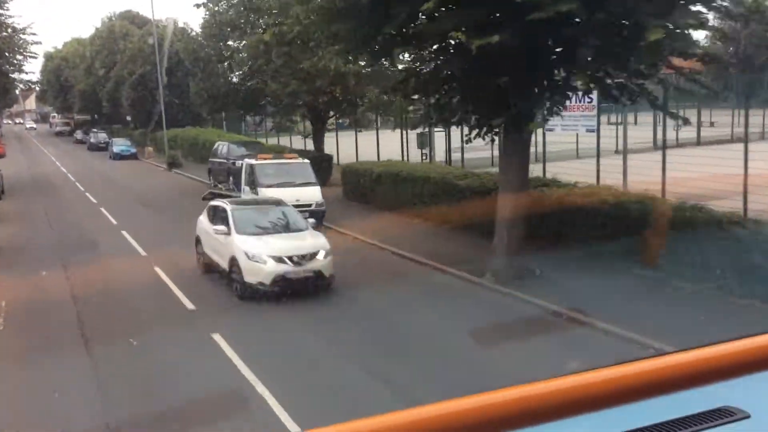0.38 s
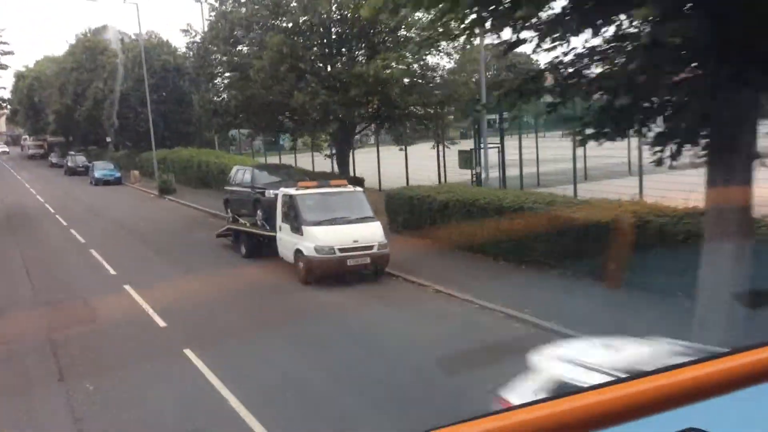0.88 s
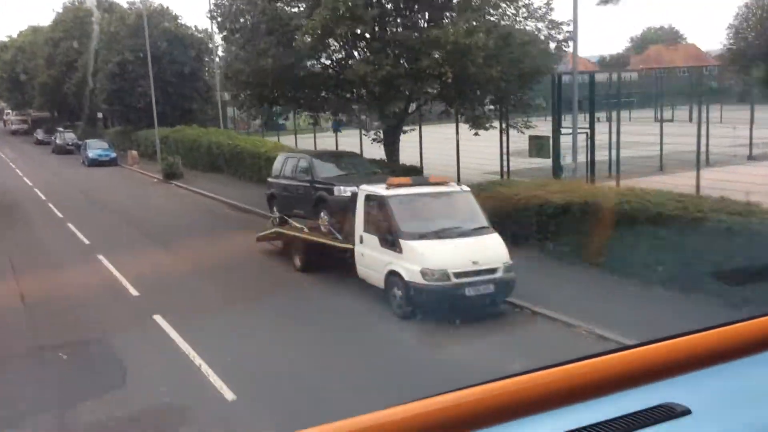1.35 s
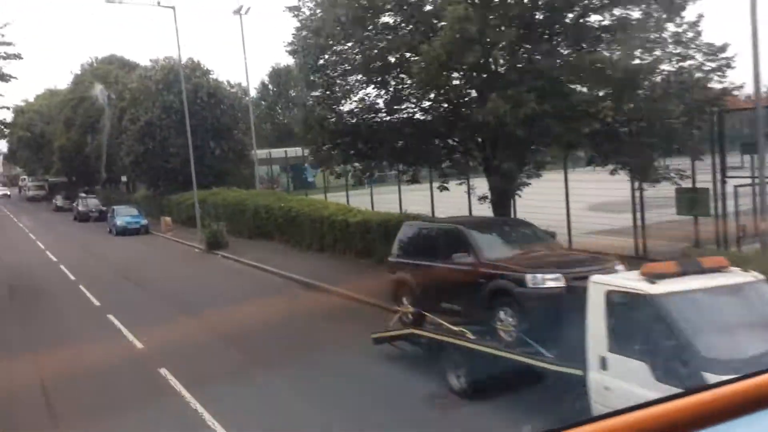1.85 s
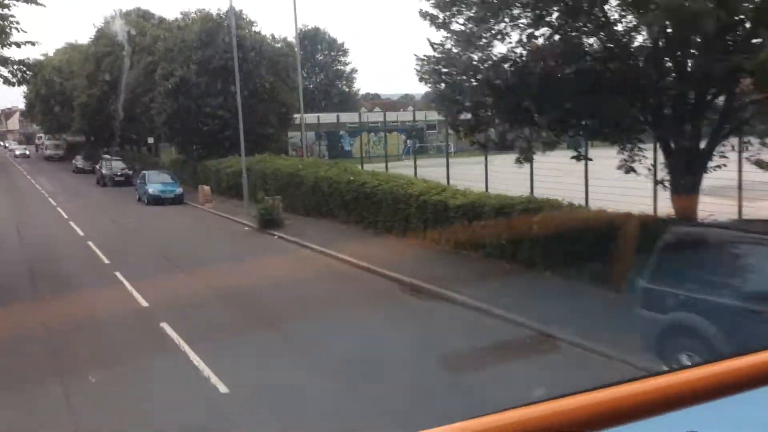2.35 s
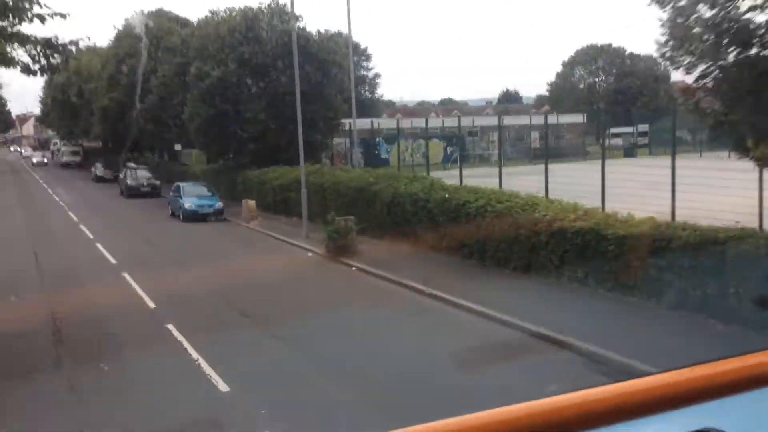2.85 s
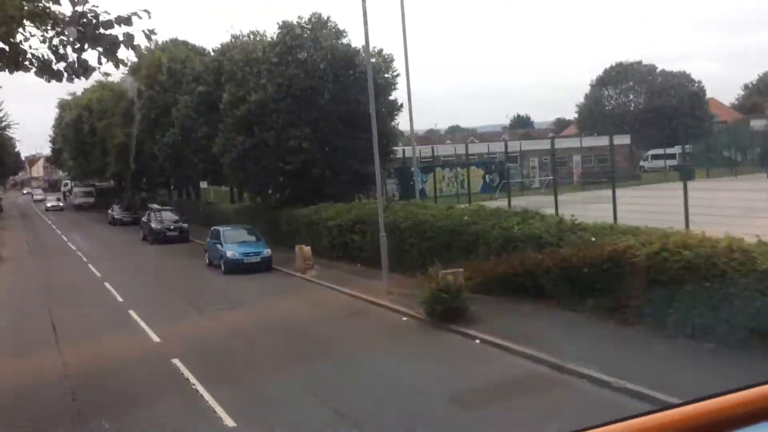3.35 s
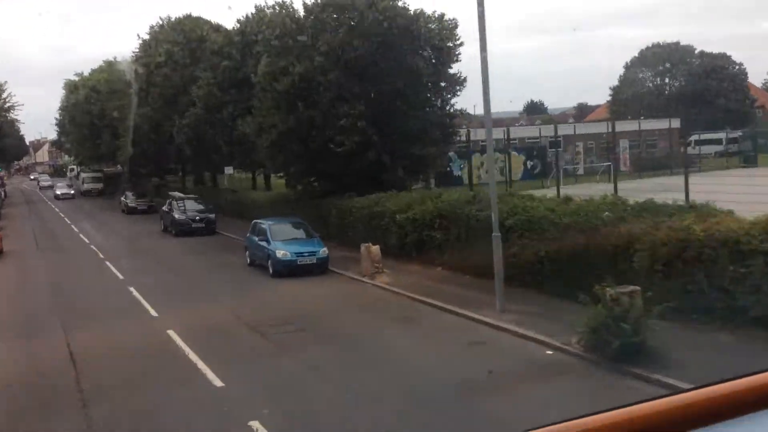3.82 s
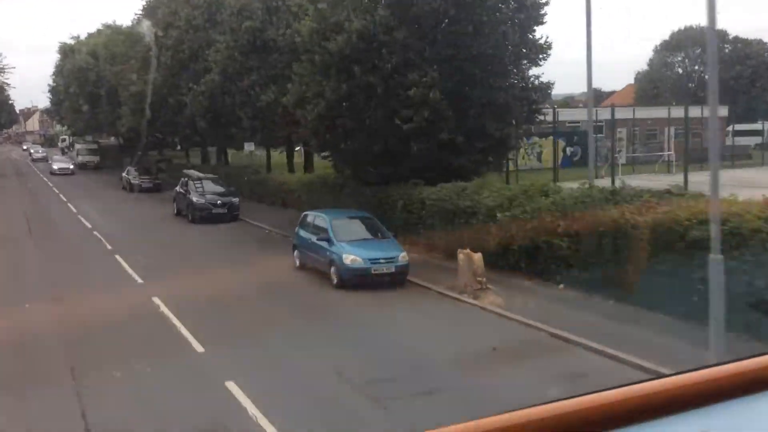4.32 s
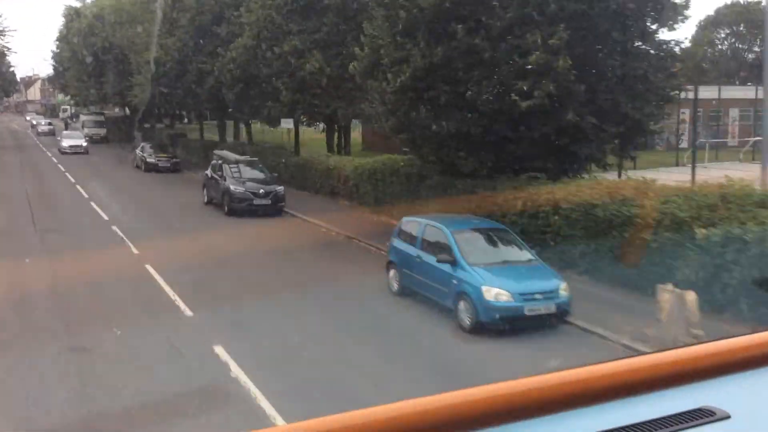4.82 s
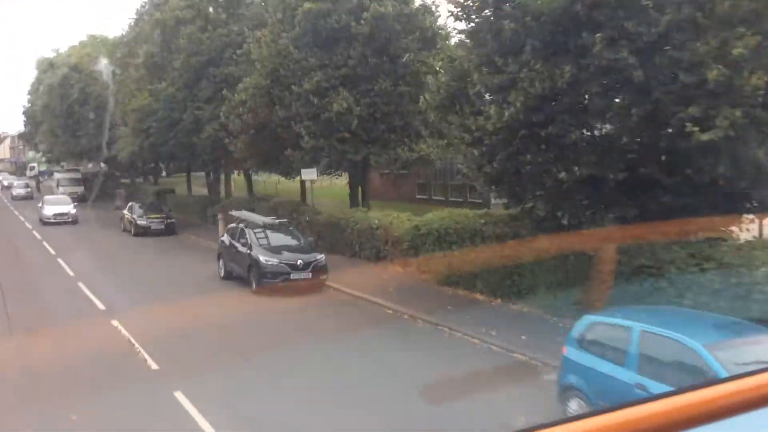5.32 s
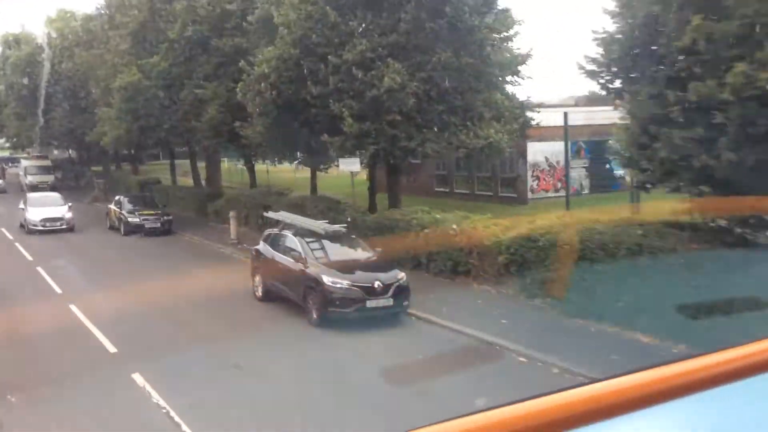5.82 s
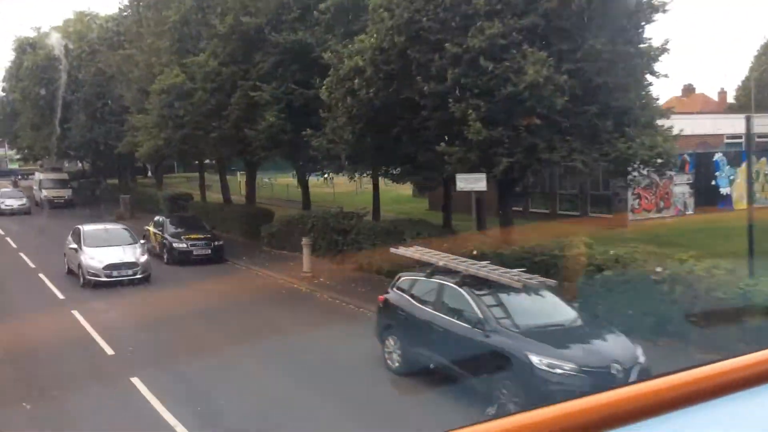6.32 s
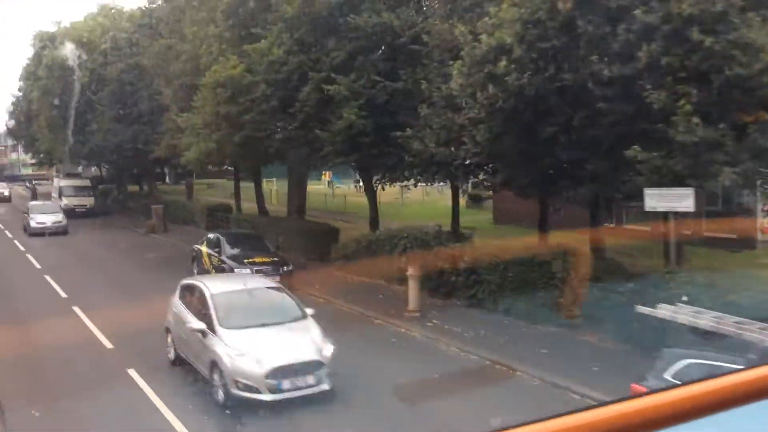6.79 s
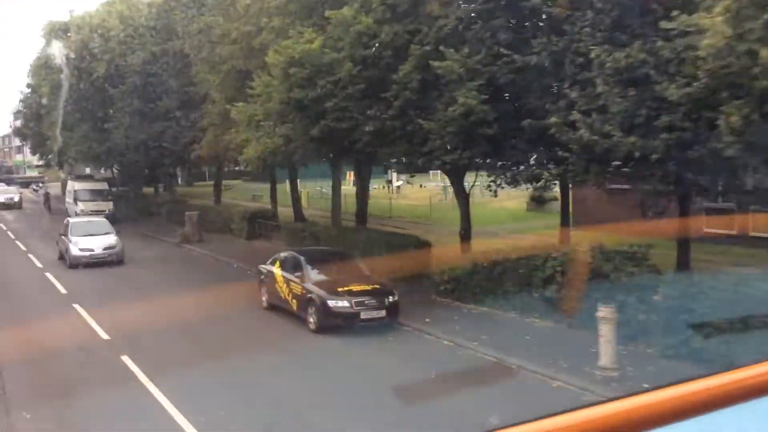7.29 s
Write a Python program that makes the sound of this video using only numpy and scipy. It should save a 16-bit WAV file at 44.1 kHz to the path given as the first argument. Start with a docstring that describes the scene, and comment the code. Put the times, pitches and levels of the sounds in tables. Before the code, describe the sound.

For about 7.4 seconds we sit at an upper-deck front window of a bus travelling steadily along a tree-lined residential road. A low diesel drone near 45 hertz, with higher hums, holds almost constant, sagging very slightly at the end. Soft road rumble and dull body roar surround it. The loose window knocks in fast, uneven chatter at roughly the engine's turning rate, with stronger knocks around 1.1-1.5, 1.9, 3.0, 3.5-3.8 and 5.0 seconds. Bumps swell the cabin boom, notably at 0.8-0.95, 1.9, 2.2 and 2.5-2.9, then more gently near 6.2 and 7.2. Trim buzz flares around 1.6 and 2.6-2.8. Thin treble ticks gather at 2.6-3.3, with isolated ones near 0.2, 1.6 and 4.0. A panel hums more around 3.8. The later seconds are somewhat calmer, the knocks generally lighter, and everything continues to the cut. Dry, close, mono, with a tiny cabin tail.

```python
"""A low diesel drone, a booming cabin, quick window knocks and buzzing trim, heard in mono at a front
seat on the upper deck of a bus at steady speed. The drone is sines on the engine's shaft orders; the road
is coloured noise with a low boom that swells over bumps. The loose window knocks about once a shaft turn,
each knock a short blow, a set of ringing modes and a rattle. A small fitting ticks in the treble, and the
cabin adds a short reverberant tail to knocks and ticks."""
import sys
import numpy as np
from scipy import signal
from scipy.fft import rfft, irfft, next_fast_len
from scipy.io import wavfile
from scipy.ndimage import map_coordinates

SR = 44100
rng = np.random.default_rng(int(sys.argv[2]) if len(sys.argv) > 2 else 0)


def invert_db(level):
    """Linear amplitude ratio for a level in decibels (20 dB per decade), elementwise."""
    return 10 ** (np.asarray(level, dtype=float) / 20)


def master_out(mix):
    """Clip the mix to full scale and print it as 16-bit PCM to the path in sys.argv[1]."""
    frames = np.transpose(np.atleast_2d(mix))
    ceiling = np.clip(frames, -1, 1)
    pcm = np.round(ceiling * 32767).astype(np.int16)
    wavfile.write(sys.argv[1], SR, pcm)


N = 327222  # length [samples]

# engine shaft speed before its small wander: (time [s], shaft turns per second [1/s])
SHAFT_SPEED = [(0, 22.58), (1.5, 22.47), (2.7, 22.41), (4.1, 22.27), (4.9, 22.47), (7.42, 22.05)]
# steady orders of the drone, before their sway: (shaft order [1], level [dB rms])
STEADY_ORDERS = [(2, -37.5), (4, -43), (6, -52), (12, -54)]
# fifth and eighth shaft orders, before their sway: (time [s], fifth [dB rms], eighth [dB rms])
CHANGING_ORDERS = [(0, -42, -43.5), (.8, -47, -46), (1.4, -40, -46.5), (2.1, -48.5, -52), (2.5, -46, -46),
                   (3.1, -44.5, -55), (3.8, -44.5, -47), (4.399, -43, -48), (5.1, -40, -46),
                   (5.5, -48, -51), (6.2, -47, -47), (6.9, -46.5, -53), (7.42, -47.5, -49.5)]
# low end along the way: (time [s], gain on rumble and second order [dB], note of the boom [Hz])
LOW_END = [(0, 0.5, 75), (.9, -1, 75), (1.5, 0.6, 78), (2.3, -1, 79), (2.7, 3, 76), (3.5, 1, 79),
           (4.2, 0.5, 80), (4.6, 0.4, 74), (5.3, 1.5, 79), (6, -1, 79), (6.5, -1.5, 78), (7.42, -1.5, 79)]
# bumps that swell the cabin boom: (start [s], length [s], level [dB])
BOOM_BUMPS = [(-0.003, 0.2, -38.5), (0.163, 0.014, -39), (0.237, 0.022, -31), (0.3, 0.036, -36),
              (0.453, 0.016, -32), (0.71, 0.046, -31), (0.833, 0.043, -27.5), (0.945, 0.015, -23),
              (1.116, 0.047, -34.5), (1.393, 0.071, -32), (1.528, 0.027, -33.5), (1.777, 0.078, -32.5),
              (1.904, 0.055, -26.5), (2.043, 0.048, -37.5), (2.176, 0.058, -28.5), (2.524, 0.344, -30),
              (2.972, 0.053, -35), (3.061, 0.098, -33), (3.197, 0.088, -36), (3.313, 0.26, -37.5),
              (3.863, 0.023, -28), (4.136, 0.021, -47), (4.267, 0.11, -37), (4.425, 0.065, -39.5),
              (4.948, 0.031, -38), (5.068, 0.13, -34), (6.103, 0.057, -33.5), (6.175, 0.037, -30),
              (6.422, 0.075, -32.5), (7.245, 0.034, -29.5), (7.343, 0.023, -37)]
# colour of the low road rumble: (frequency [Hz], relative density [dB per Hz])
RUMBLE_COLOUR = [(20, -12), (34, -6), (54, -1), (70, -0.5), (99, -3), (112, 0), (125, -4.5), (150, -4.5),
                 (168, -11.5), (208, -10.5), (255, -18.5), (297, -21), (322, -42), (430, -72), (800, -120)]
# road surface under the bus: (time [s], body roar [dB], trim buzz [dB])
ROAD_SURFACE = [(0, -48, -55.5), (.45, -49, -59), (.8, -49.5, -63.5), (.84, -49, -55.5), (1.1, -46, -57.5),
                (1.4, -45, -55.5), (1.62, -47, -50), (1.72, -47.5, -60.5), (1.93, -46.5, -57),
                (2.2, -48.5, -61.5), (2.5, -48.5, -57), (2.58, -45, -52), (2.83, -49.5, -52.5),
                (2.93, -49, -56.5), (3.3, -49, -53), (3.6, -49, -56), (3.95, -50, -60), (4.17, -48, -58),
                (4.3, -49.5, -60), (4.6, -49.5, -61), (4.75, -50, -58.5), (5.05, -49, -56.5),
                (5.3, -51, -61), (5.48, -50.5, -59), (5.65, -50, -60.5), (5.85, -52, -59),
                (6.4, -49.5, -62.5), (7.1, -48.5, -61), (7.42, -48.5, -56.5)]
# colour of the body roar: (frequency [Hz], relative density [dB per Hz])
ROAR_COLOUR = [(180, -25), (300, -12.5), (328, -0.5), (459, -3.5), (521, -2.5), (653, -2), (1140, -6.5),
               (1480, -11.5), (2600, -21.5), (3380, -22.5), (5720, -120)]
# floor and panels that colour the roar: (frequency [Hz], width [Hz], level relative to the roar [dB])
PANEL_HUMS = [(296.5, 27, -14.5), (612, 31, -16), (667, 44, -14.5), (764, 50, -16), (977, 96, -18.5),
              (1471, 29, -22)]
# notes of one floor panel: (frequency [Hz], level relative to its hum [dB])
FLOOR_PANEL_NOTES = [(390, -0.7), (447, -1.7)]
# hum of that floor panel: (time [s], level relative to the roar [dB])
FLOOR_PANEL_HUM = [(0, -13), (.6, -14.5), (2.2, -17), (3.2, -7), (3.8, -4), (4.3, -10.5), (5.5, -8.5),
                   (6.5, -9.5), (7.42, -12.5)]
# colour of the trim buzz: (frequency [Hz], relative density [dB per Hz])
BUZZ_COLOUR = [(710, -2), (1200, -6), (1480, 0), (1610, -3), (2680, -6), (3050, -10), (3500, -3),
               (4420, -8.5), (5010, -8.5), (6820, -15), (7500, -16.5), (8100, -14.5), (8700, -18),
               (9270, -18), (11500, -27.5), (14200, -38.5), (15100, -47)]
# clear knocks of the window: (time of the clack [s], nominal peak [dB])
CLEAR_KNOCKS = [(0.0453, -40.5), (0.0867, -37.5), (0.2209, -42), (0.2883, -42.5), (0.3571, -44),
                (0.4284, -46), (0.5115, -45), (0.5567, -45.5), (0.6444, -51), (0.6898, -49.5),
                (0.824, -39.5), (0.8949, -37.5), (0.9803, -45), (1.0176, -46), (1.051, -39.5),
                (1.0892, -35.5), (1.1792, -39), (1.2274, -39), (1.275, -37), (1.3159, -40), (1.3638, -40.5),
                (1.4045, -32), (1.4484, -35.5), (1.489, -34), (1.5345, -46), (1.6242, -38.5), (1.666, -45),
                (1.785, -42), (1.8206, -46), (1.8504, -38.5), (1.8906, -32.5), (1.9362, -38), (1.982, -45),
                (2.0288, -39.5), (2.0957, -42.5), (2.1455, -48), (2.19, -51), (2.229, -43), (2.362, -44),
                (2.4236, -42), (2.5476, -38), (2.586, -37.5), (2.622, -37.5), (2.6837, -41),
                (2.7151, -39.5), (2.7781, -44), (2.9133, -50), (2.9542, -38), (2.9939, -41),
                (3.0324, -34.5), (3.075, -37), (3.1492, -42.5), (3.2355, -42), (3.3002, -43.5),
                (3.344, -37.5), (3.3687, -39.5), (3.3957, -44), (3.4296, -42), (3.468, -45),
                (3.5155, -36.5), (3.5657, -32), (3.6122, -40.5), (3.657, -36), (3.707, -34.5),
                (3.7499, -38.5), (3.841, -36.5), (3.9337, -41.5), (3.9737, -39.5), (4.0682, -46.5),
                (4.1066, -38.5), (4.155, -36.5), (4.2443, -49), (4.3316, -45), (4.4648, -46),
                (4.5627, -41.5), (4.6107, -43), (4.6872, -46.5), (4.7082, -42), (4.7446, -44),
                (4.7805, -40), (4.8179, -42.5), (4.904, -43.5), (4.9495, -38.5), (4.996, -35),
                (5.0434, -31.5), (5.0888, -39), (5.1766, -38), (5.2644, -50), (5.309, -42.5),
                (5.3537, -38.5), (5.4001, -41), (5.4456, -35.5), (5.4849, -38), (5.5308, -41),
                (5.671, -41.5), (5.711, -43.5), (5.7309, -42.5), (5.8042, -41), (5.847, -45), (5.8886, -44),
                (5.9788, -36.5), (6.0686, -44), (6.116, -41.5), (6.1624, -42.5), (6.2444, -47),
                (6.2916, -44), (6.3689, -47.5), (6.4325, -43), (6.4772, -44.5), (6.5182, -40.5),
                (6.6573, -39), (6.6977, -46.5), (6.744, -48), (6.788, -43.5), (6.8297, -46), (6.8887, -43),
                (6.945, -44.5), (7.0189, -37.5), (7.0628, -43), (7.104, -43.5), (7.1472, -45),
                (7.1969, -38.5), (7.2937, -48), (7.3325, -41), (7.354, -45)]
# click, knock and clack in each blow:
# (frequency [Hz], level relative to the knock [dB], peak after first contact [s])
BLOW_PARTS = [(5050, -8.5, 0.0011), (1521, -10, 0.0027), (2353, -13.5, 0.0023), (3102, -2, 0.0025),
              (3525, -7, 0.0032), (3940, -13.5, 0.0012)]
# modes of pane and frame:
# (frequency [Hz], level relative to the knock [dB], t60 [s], start after first contact [s])
PANE_MODES = [(449, -10, 0.11, 0.0009), (634, -9.5, 0.098, 0.00088), (747, -8.5, 0.024, 0.00076),
              (1000, -23, 0.14, 0.00069), (1220, -22, .1, .0008), (1455, -12, 0.074, 0.00072),
              (1976, -14.5, 0.057, 0.00099), (2420, -22.5, 0.11, .0012), (2580, -23.5, .09, 0.00121),
              (3027, -16, .1, .0042), (3430, -17, 0.092, .0042), (3890, -19, 0.058, .001),
              (4130, -22.5, .07, 0.00104), (4680, -27, .09, .002), (5240, -33, .09, .002),
              (5870, -29, 0.032, 0.00014), (6380, -24, 0.028, .0001)]
# thin ticks of a small fitting: (time [s], nominal level [dB])
FITTING_TICKS = [(0.1945, -56.5), (1.5998, -53.5), (2.5865, -55), (2.603, -51), (2.616, -52), (2.6439, -53),
                 (2.7194, -54), (2.795, -55), (2.844, -52), (3.174, -51), (3.2344, -57), (3.3104, -58),
                 (4.0322, -59)]
# decay of the cabin: (frequency [Hz], t60 [s])
CABIN_DECAY = [(500, 0.11), (3000, 0.22), (10000, 0.28)]


def unit(x):
    """Scaled to rms 1."""
    return x / np.sqrt(np.mean(x ** 2) + 1e-20)


def along(points, hz):
    """Values at hz, read from (frequency, value) points on a log axis."""
    f, v = np.transpose(points)
    return np.interp(np.log(hz + 1), np.log(f + 1), v)


def curves(rows):
    """One value per sample for each column after the time."""
    s, *cols = np.transpose(rows)
    return [np.interp(np.arange(N) / SR, s, c) for c in cols]


def wobble(rate):
    """A smooth random curve through normal draws, rate knots a second."""
    knots = rng.standard_normal(int(N * rate / SR) + 4)
    return map_coordinates(knots, [np.arange(N) * rate / SR])


def filtered(x, response):
    """x passed through a response of frequency, by FFT."""
    m = next_fast_len(N + SR // 2)
    return irfft(rfft(x, m) * response(np.fft.rfftfreq(m, 1 / SR)), m)[..., :N]


def ringing(modes):
    """Causal response of (Hz, width Hz, dB) resonances, neighbours in opposite phase."""
    return lambda f: sum((-1) ** k * invert_db(db) * 1j * f * w / (c * c - f * f + 1j * f * w)
                         for k, (c, w, db) in enumerate(modes))


def rush(colour):
    """Noise of rms 1 in a given colour."""
    return unit(filtered(rng.standard_normal(N), lambda hz: invert_db(along(colour, hz))))


def engine():
    """Shaft orders: sines at multiples of one shaft angle, each swaying in level as the body flexes."""
    turns = np.cumsum(curves(SHAFT_SPEED)[0] + 0.08 * wobble(6)) / SR
    heft_db, _ = curves(LOW_END)
    drone = np.zeros(N)
    for order, db in STEADY_ORDERS + list(zip((5, 8), curves(CHANGING_ORDERS))):
        if order < 3:
            sway_db = 1.6 * wobble(7) + heft_db
        else:
            sway_db = 1.1 * wobble(7)
        wave = np.sin(2 * np.pi * (order * turns + rng.random()))
        drone += np.sqrt(2) * invert_db(db + sway_db) * wave
    return drone


def boom_swell():
    """Size of the cabin boom: a fluttering idle plus a soft-edged swell over each bump."""
    idle_db, flutter_db, edge_s = -42, 1.5, 0.015
    t = np.arange(N) / SR
    swells = np.zeros(N)
    for start, length, db in BOOM_BUMPS:
        from_middle = np.abs(t - start - length / 2)
        edge = np.maximum(from_middle - length / 2 + edge_s, 0) / edge_s
        swells += invert_db(db) * np.exp(-edge ** 2 / 2)
    return invert_db(idle_db + flutter_db * wobble(7.6)) + swells


def shaken_note(hz):
    """A sine at a moving frequency, shaken in size and pitch."""
    size = invert_db(1.8 * wobble(10))
    return size * np.sin(2 * np.pi * np.cumsum(hz + 2.2 * wobble(10)) / SR)


def cabin_boom(size):
    """The cabin air rings at a wandering low note and near the fourth shaft order."""
    _, boom_hz = curves(LOW_END)
    notes = 0.8 * shaken_note(boom_hz) + shaken_note(4 * curves(SHAFT_SPEED)[0])
    return size * unit(notes)


def rumble(size):
    """Low coloured noise from the tyres, rising slightly with the boom."""
    heft_db, _ = curves(LOW_END)
    level = invert_db(heft_db - 35.5 + 1.3 * wobble(22))
    return level * unit(size ** 0.12) * rush(RUMBLE_COLOUR)


def panels():
    """Each panel note hums as narrow resonant noise that comes and goes on its own."""
    floor_width_hz = 48
    hum_db = curves(FLOOR_PANEL_HUM)[0]
    floor = [(hz, floor_width_hz, hum_db + db) for hz, db in FLOOR_PANEL_NOTES]
    hums = np.zeros(N)
    for hz, width, db in PANEL_HUMS + floor:
        resonance = ringing([(hz, width, 0)])
        narrow = filtered(rng.standard_normal(N), lambda f: resonance(f) ** 2)
        hums += invert_db(db + 1.5 * wobble(8)) * unit(narrow)
    return hums


def roar():
    """Mid noise of the body, coloured by humming panels, its level following the road surface."""
    roar_db, _ = curves(ROAD_SURFACE)
    return invert_db(roar_db + 1.08 * wobble(12)) * (0.89 * rush(ROAR_COLOUR) + panels())


def stirred():
    """Extra buzz power that each clear knock leaves in the trim, dying away."""
    stir_db, t60_s = -12, 0.31  # relative to the knock's nominal peak
    s, db = np.transpose(CLEAR_KNOCKS)
    jolts = np.bincount(np.round(s * SR).astype(int), invert_db(db + stir_db) ** 2, N)
    decay = invert_db(-60 * np.arange(SR // 2) / SR / t60_s) ** 2
    return np.abs(signal.fftconvolve(jolts, decay)[:N])


def trim_buzz():
    """Trim in tiny contacts, most faint and a few strong, on a bed of hiss, all in one colour."""
    contacts_per_s = 900
    _, buzz_db = curves(ROAD_SURFACE)
    strength = invert_db(3 * np.minimum(rng.exponential(size=N), 3))
    contacts = (rng.random(N) < contacts_per_s / SR) * rng.standard_normal(N) * strength
    grit = 0.5 * unit(contacts) + rng.standard_normal(N)
    buzz = unit(filtered(grit, lambda hz: invert_db(along(BUZZ_COLOUR, hz))))
    flicker_db = 1.3 * wobble(25)
    power = invert_db(buzz_db + flicker_db) ** 2 + stirred()
    return np.sqrt(power) * buzz


def knock_list():
    """Times and levels of the clear knocks, and of a faint one about every shaft turn between them."""
    looseness = 0.1  # timing scatter [turns]
    faint_db_over_buzz, scatter_db = 6, 3
    clear_s, clear_db = np.transpose(CLEAR_KNOCKS)
    turn_s = 1 / np.interp(clear_s, *np.transpose(SHAFT_SPEED))[:, None]
    chance = rng.standard_normal((len(clear_s), 16, 2))
    faint_s = clear_s[:, None] + turn_s * (np.arange(1, 17) + looseness * chance[..., 0])
    # keep those at least half a turn ahead of the next clear knock
    next_s = np.append(clear_s[1:], N / SR)[:, None]
    free = faint_s < next_s - turn_s / 2
    surface_s, _, buzz_db = np.transpose(ROAD_SURFACE)
    faint_db = np.interp(faint_s, surface_s, buzz_db) + faint_db_over_buzz + scatter_db * chance[..., 1]
    return np.append(clear_s, faint_s[free])[:, None], np.append(clear_db, faint_db[free])[:, None]


def pane_modes(t):
    """Decaying sines of pane and frame, one row a mode, neighbours in opposite phase."""
    hz, db, t60, start = np.transpose(PANE_MODES)[..., None]
    since = np.maximum(t - start, 0)
    sign = (-1) ** np.arange(len(PANE_MODES))[:, None]
    return sign * invert_db(db - 60 * since / t60) * np.sin(2 * np.pi * hz * since)


def blow_parts(t):
    """Click, knock and clack: sines under bell-shaped envelopes a few cycles wide, one row each."""
    bell_cycles = 2.4  # standard deviation of the envelope
    hz, db, peak = np.transpose(BLOW_PARTS)[..., None]
    bell = np.exp(-((t - peak) * hz / bell_cycles) ** 2 / 2)
    return invert_db(db) * bell * np.sin(2 * np.pi * hz * t)


def window():
    """Knocks share one blow and one set of modes, scattered a little in colour, over a treble rattle."""
    size = 8192  # samples a knock
    lead_s = 0.001307  # first contact ahead of the clack
    colour_scatter_db = 2
    rattle_db, rattle_t60_s, rattle_low_hz, rattle_high_hz = -20, 0.05, 6800, 10500
    t = np.arange(size) / SR
    s, db = knock_list()

    mode_scatter_db = colour_scatter_db * rng.standard_normal((len(s), len(PANE_MODES)))
    blow_scatter_db = colour_scatter_db / 2 * rng.standard_normal((len(s), len(BLOW_PARTS)))
    knock = invert_db(mode_scatter_db) @ pane_modes(t) + invert_db(blow_scatter_db) @ blow_parts(t)
    onset = 1 - np.exp(-t / 0.001)
    rattle = invert_db(rattle_db - 60 * t / rattle_t60_s) * onset * rng.standard_normal(knock.shape)

    at = (np.round((s - lead_s) * SR).astype(int) + np.arange(size)).ravel()

    def placed(rows):
        """Every knock's row summed at its own time and level."""
        return np.bincount(at, (invert_db(db) * rows).ravel(), N + size)[:N]

    def treble(f):
        """Band-pass gain of the rattle."""
        return 1 / (1 + (rattle_low_hz / (f + 1)) ** 6 + (f / rattle_high_hz) ** 6)

    return placed(knock) + filtered(placed(rattle), treble)


def cabin(x):
    """The cabin's answer: a noise tail of unit energy, each frequency dying at its own speed."""
    hz, t, z = signal.stft(rng.standard_normal(SR // 3), SR, nperseg=256)
    decay = invert_db(-60 * t / along(CABIN_DECAY, hz)[:, None])
    tail = signal.istft(z * decay, SR, nperseg=256)[1]
    return signal.fftconvolve(x, tail / np.linalg.norm(tail))[:N]


def fitting():
    """Ticks of a small fitting: bursts of noise, gone in milliseconds, through treble resonances."""
    t = np.arange(SR // 100) / SR
    force = np.zeros(N)
    for s, db in FITTING_TICKS:
        burst = invert_db(db + 12 - 60 * t / 0.012) * rng.standard_normal(len(t))  # 12 dB up into the filter
        force[round(s * SR):][:len(t)] += burst
    resonance = ringing([(8300, 3000, -2), (12000, 6000, 0)])
    return filtered(force, lambda hz: resonance(hz) ** 2)


def scene():
    """Everything as heard at a front seat, in one channel."""
    size = boom_swell()
    road = cabin_boom(size) + rumble(size) + roar() + trim_buzz()
    knocks = window() + fitting()
    return (engine() + road + knocks + invert_db(-7) * cabin(knocks))[None]


def roll_off(x):
    """The treble ends steeply here."""
    return signal.sosfilt(signal.butter(12, 15240, fs=SR, output="sos"), x)


def record(dry):
    """The finished mix as it is kept."""
    return roll_off(dry)


dry = scene()
out = record(dry)
master_out(out)
```